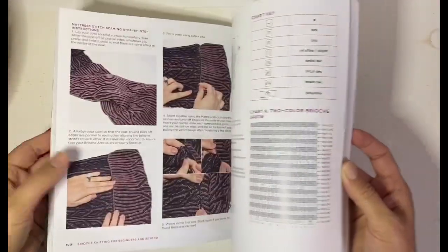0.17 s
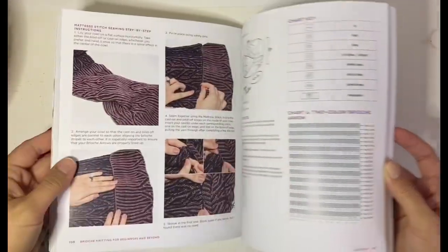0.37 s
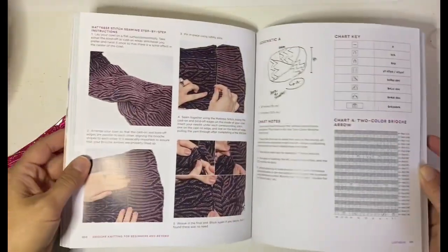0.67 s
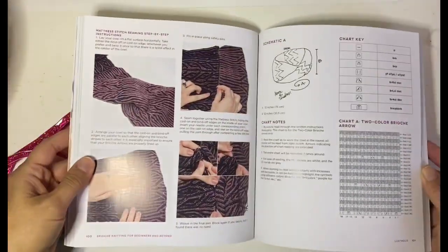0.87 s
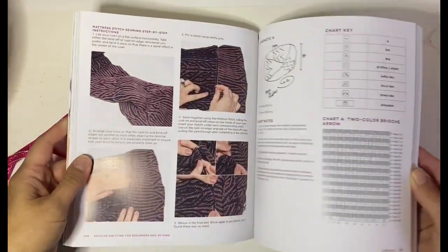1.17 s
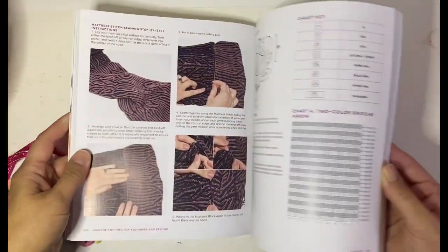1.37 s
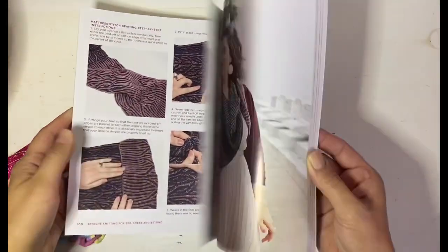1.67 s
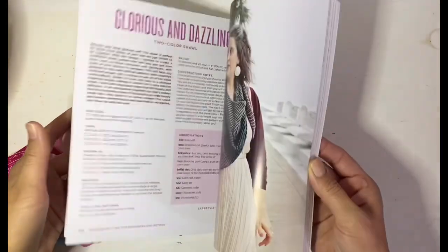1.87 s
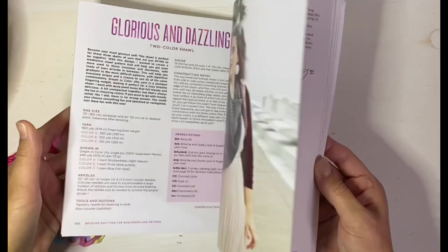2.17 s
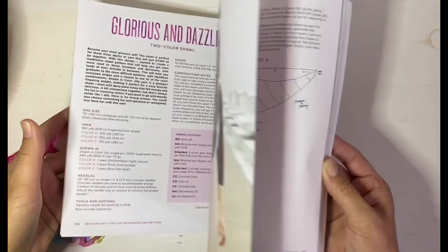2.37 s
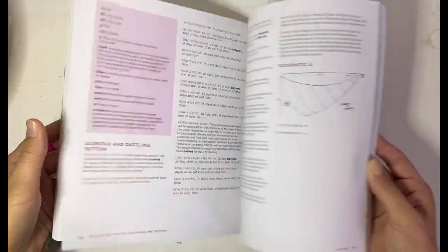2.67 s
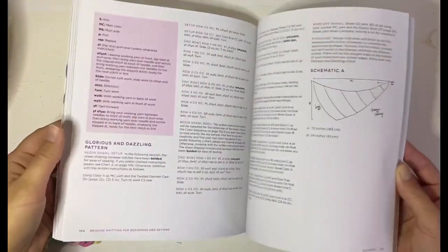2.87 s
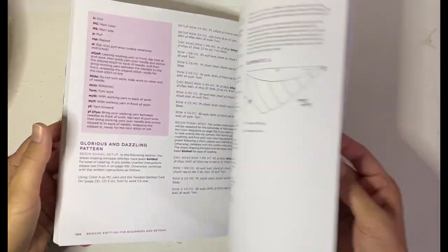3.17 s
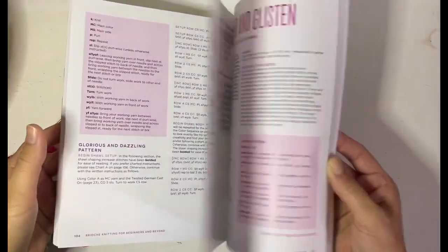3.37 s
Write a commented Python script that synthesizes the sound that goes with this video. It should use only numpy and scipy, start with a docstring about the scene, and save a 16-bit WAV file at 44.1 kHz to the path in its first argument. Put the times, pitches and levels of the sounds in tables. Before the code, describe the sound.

Glossy book pages are turned by hand close to the microphone. A soft swish leads into rustling, finger pats and several sharp paper snaps, with dull bumps from the book, over a quiet room's low rumble.

```python
"""The pages of a glossy paperback are turned by hand, close by, in a quiet room with a low rumble.
Fingers pat the paper, sheets rub and hiss as they slide over each other, the book shifts and bumps,
and a page opens under the thumb with a soft, dull swish. Page edges snap off the thumb: each snap runs
through the sheet as a bending wave, high notes first, and nudges the book into a soft thump."""
import sys
import numpy as np
from scipy import signal
from scipy.fft import rfft, irfft
from scipy.io import wavfile

SR = 44100
rng = np.random.default_rng(int(sys.argv[2]) if len(sys.argv) > 2 else 0)


def output_pcm(signal):
    """Save a mono or channel-first signal as 16-bit PCM at the path in sys.argv[1].

    Samples are clipped to [-1, 1] before scaling.
    """
    pcm = np.clip(np.atleast_2d(signal).T, -1, 1) * 32767
    wavfile.write(sys.argv[1], SR, np.round(pcm).astype(np.int16))


N = 155232
T, HZ = np.arange(N) / SR, np.fft.rfftfreq(N, 1 / SR)


def amp(db):
    """Turns decibels into a gain."""
    return 10 ** (np.asarray(db) / 20)


def unit(x):
    """Scales a signal to an average (rms) level of 1."""
    return x / np.sqrt(np.mean(abs(x) ** 2) + 1e-30)


def read(points, hz=HZ):
    """Joins a table's points into a curve along a log-frequency axis."""
    freqs, values = np.transpose(points)
    return np.interp(np.log(hz + 1), np.log(freqs), values)


def pair(a, b, likeness):
    """Mixes two noises into left and right: likeness 0 is unrelated, 1 is identical."""
    mid, side = np.sqrt((1 + likeness) / 2) * a, np.sqrt((1 - likeness) / 2) * b
    return np.array([mid + side, mid - side])


def stroke(start, end, rise, fall):
    """The speed of one movement: it eases in from start, holds, and fades after end."""
    ease_in = np.sin(np.pi / 2 * np.clip((T - start) / rise, 0, 1))
    return ease_in * np.exp(-(np.maximum(T - end, 0) / fall) ** 2)


# Room air and microphone hiss. Each row: frequency in Hz, relative level in dB.
AIR_COLOUR = [(15, -16), (30, -12), (50, -2.5), (105, 0), (250, -6.5), (310, -12), (385, -24.5),
              (620, -29.5), (1000, -28.5), (1500, -33), (2100, -36), (3000, -43), (5200, -49), (7000, -53),
              (10000, -58), (12000, -55.5), (14000, -47), (16000, -79.5)]
# The room's low resonances. Each row: frequency in Hz, width in Hz, level in dB.
ROOM_RESONANCES = [(58.9, 25, -54), (77, 13, -52.5), (124.9, 26, -56), (197.7, 22, -60), (257.5, 11, -66.5),
                   (284, 14, -66.5), (457, 55, -77), (793.6, 27, -76), (859, 290, -72)]
# The room's stereo spread. Each row: frequency in Hz, left-right likeness from 0 to 1.
AIR_LIKENESS = [(100, 1), (200, 0.99), (350, 0.88), (650, 0), (1200, 0), (1850, 0.67), (2900, .25),
                (4500, 0.13), (5500, 1), (7200, 1), (10000, 0.93), (16000, 1)]

def room_tone(air_db=-55):
    """Steady air, and a rumble that booms in the low resonances of the room."""
    power = (amp(air_db) * unit(amp(read(AIR_COLOUR)))) ** 2
    for hz, width, db in ROOM_RESONANCES:
        peak = 1 / (1 + (1.29 * (HZ - hz) / width) ** 2) ** 1.42
        power += (amp(db) * unit(peak)) ** 2
    noise = pair(*rfft(rng.standard_normal((2, N))), read(AIR_LIKENESS))
    return irfft(noise * np.sqrt(power), N)


# The paper's stereo spread. Each row: frequency in Hz, left-right likeness from 0 to 1.
PAPER_LIKENESS = [(300, 0.18), (800, 0.33), (1800, 0.79), (2900, 0.38), (5000, 0.65), (7200, 1), (10000, 1),
                  (13500, 0.96), (16000, 0.67)]

def friction(colour, slips_per_s=6500, spread_db=2):
    """Rubbing is thousands of tiny slips of uneven size; the surfaces set their tone colour."""
    sizes = amp(spread_db * np.minimum(rng.exponential(1, (2, N)), 5))
    slips = sizes * rng.choice([-1, 1], (2, N)) * (rng.random((2, N)) < slips_per_s / SR)
    spectrum = pair(*rfft(slips), read(PAPER_LIKENESS))
    return unit(irfft(spectrum * amp(read(colour)), N))


# Finger taps. Each row: start in seconds, level in dB.
FINGER_PATS = [(0.031, -59), (0.242, -64), (0.887, -55.5), (1.077, -55), (1.431, -63), (2.02, -64),
               (2.443, -63), (2.583, -63)]
# The tone of a tap. Each row: frequency in Hz, relative level in dB.
PAT_COLOUR = [(200, -34), (450, 4.5), (620, -4), (1000, -9), (2200, -23.5), (4000, -45), (16000, -68)]

def patting_fingers(decay_s=0.011):
    """Soft fingertips land on the stack of pages with a hollow pat."""
    touch = np.zeros(N)
    for start, db in FINGER_PATS:
        decay = np.exp(-np.maximum(T - start, 0) / decay_s)
        touch += amp(db) * stroke(start, start, rise=0.0051, fall=1) * decay
    return touch * friction(PAT_COLOUR)


def judder(depth_db=0.78, cutoff_hz=24.4):
    """An uneven grip makes the loudness of rubbing flutter."""
    wobble = irfft(rfft(rng.standard_normal(N)) / (1 + (HZ / cutoff_hz) ** 2), N)
    return amp(depth_db * unit(wobble))


def resonate(x, hz, width_hz):
    """A resonance that lets through a narrow band around the moving pitch hz."""
    turn = np.exp(2j * np.pi * np.cumsum(hz) / SR)
    feedback = np.exp(-np.pi * width_hz / SR)
    return 2 * (turn * signal.lfilter([1 - feedback], [1, -feedback], x / turn)).real


def ripple(x, depth_db=2.5, spacing_hz=91.8):
    """Every curved sheet has its own shallow resonances, drawn here at random."""
    freqs = np.arange(0, SR / 2, spacing_hz)
    gains_db = depth_db * rng.standard_normal(len(freqs))
    return irfft(rfft(x) * amp(np.interp(HZ, freqs, gains_db)), N)


# Sheets sliding. Each row: start, end, rise and fall in seconds, rub level in dB, hiss level in dB,
# the sheet's resonance halfway through in Hz.
PAGE_SLIDES = [(0.046, 0.476, 0.19, 0.093, -76, -99, 2450), (0.212, 0.223, .012, 0.016, -75, -82, 5270),
               (0.725, 0.85, .06, 0.044, -75, -87.5, 1310), (0.855, 0.889, 0.043, 0.029, -66.5, -74, 2200),
               (0.91, 1.005, 0.029, 0.025, -65, -68.5, 4940), (1.018, 1.137, 0.03, 0.06, -65.5, -75, 3570),
               (1.152, 1.26, 0.085, 0.074, -64.5, -77, 1380), (1.316, 1.367, 0.016, 0.09, -70.5, -79, 1760),
               (1.415, 1.621, 0.025, 0.046, -70.5, -75.5, 5500),
               (1.595, 1.613, 0.026, 0.011, -60, -73.5, 2160),
               (1.656, 1.796, 0.11, 0.038, -76, -83.5, 2380), (1.796, 1.897, 0.086, 0.057, -69, -78, 3640),
               (2.011, 2.025, 0.008, 0.028, -76, -80, 3000), (2.274, 2.56, 0.12, 0.065, -72, -84.5, 2430),
               (2.58, 2.66, 0.068, 0.082, -69.5, -82.5, 1840), (2.744, 2.934, 0.04, 0.035, -91, -94, 2600),
               (2.986, 3.18, 0.11, 0.048, -73, -76, 2120), (3.395, 3.53, 0.025, 0.027, -77, -82.5, 5450)]
# The rub and the hiss of paper on paper. Each row: frequency in Hz, relative level in dB.
RUB_COLOUR = [(150, -33), (450, 9.5), (620, 4), (1000, 3.5), (1600, -3), (2400, -2), (3400, -5),
              (5200, -6.5), (6800, -17), (9000, -35), (16000, -41)]
HISS_COLOUR = [(500, -47), (2000, 2), (3800, -13.5), (5200, 6.5), (7200, 2), (8200, 2), (11000, -0.5),
               (13000, 0), (15500, -7)]

def sliding_pages(resonance_db=-4, octaves_per_s=0.5):
    """A dull rub and a fine hiss pass through a sheet whose resonance climbs as it bends."""
    rub, hiss = friction(RUB_COLOUR), friction(HISS_COLOUR)
    out = np.zeros((2, N))
    for start, end, rise, fall, rub_db, hiss_db, sheet_hz in PAGE_SLIDES:
        paper = amp(rub_db) * rub + amp(hiss_db) * hiss
        glide = 2 ** np.clip(octaves_per_s * (T - (start + end) / 2), -1, 1)
        paper += amp(resonance_db) * resonate(paper, sheet_hz * glide, width_hz=200)
        level = np.hypot(amp(rub_db), amp(hiss_db))
        out += level * stroke(start, end, rise, fall) * unit(ripple(paper))
    return judder() * out


def thud(t, hz, decay_s):
    """The book swings at a low pitch, starting softly and dying away."""
    return np.sin(2 * np.pi * hz * t) * np.sqrt(2 * np.e * t / decay_s) * np.exp(-t / decay_s)


# Changes of grip. Each row: start, end, rise and fall in seconds, level in dB.
GRIP_SHIFTS = [(0.061, 0.264, 0.0083, 0.02, -52.5), (0.75, 0.95, 0.044, 0.048, -51.5)]
# The book's dull rumble. Each row: frequency in Hz, relative level in dB.
BOOK_COLOUR = [(30, -23), (70, 3), (135, 5.5), (165, -9.5), (210, -2.5), (300, -17.5), (420, -40),
               (900, -52), (4000, -91)]
# Bumps against the hands. Each row: start in seconds, pitch in Hz, level in dB.
BOOK_BUMPS = [(0.075, 81, -43), (0.085, 199, -49.5), (0.805, 201, -47.5), (0.82, 68.5, -41.5),
              (0.955, 220, -46), (1.037, 83, -39), (1.439, 71.7, -42.5), (2.254, 279.7, -51),
              (2.875, 76.5, -39), (3.149, 239.3, -51)]

def shifting_book():
    """The block of pages rumbles as the hands shift their grip, and bumps now and then."""
    effort = sum(amp(db) * stroke(*timing) for *timing, db in GRIP_SHIFTS)
    rumble = unit(irfft(rfft(rng.standard_normal(N)) * amp(read(BOOK_COLOUR)), N))
    bumps = sum(amp(db) * thud(np.maximum(T - start, 0), hz, decay_s=0.021)
                for start, hz, db in BOOK_BUMPS)
    return effort * rumble + bumps


# The swish of the opening page. Each row: start, end, rise and fall in seconds, level in dB.
SWISHES = [(0.49, 0.632, .135, 0.11, -59.5)]
# Skin on paper. Each row: frequency in Hz, relative level in dB.
SKIN_COLOUR = [(150, -25), (450, 2), (620, 3), (800, 5.5), (1130, -2.5), (1350, 1.5), (1750, -10),
               (2150, -3.5), (2500, -13), (2900, -6.5), (5000, -15.5), (7000, -26.5), (10000, -37.5),
               (16000, -45)]

def page_swish():
    """A soft, dull swish as the page opens under the sliding thumb."""
    speed = sum(amp(db) * stroke(*timing) for *timing, db in SWISHES)
    return judder() * speed * friction(SKIN_COLOUR)


BEND_LAG_S = 0.00258  # travel time of a 1 kHz bending wave
# The crack of a page edge. Each row: frequency in Hz, relative level in dB.
CRACK_COLOUR = [(300, -14), (1500, -31), (2300, -39), (3100, -5.5), (4200, -17.5), (5400, 2), (6600, -7),
                (8900, 5), (10500, -0.5), (13000, 3), (16000, 1)]

def snap(flex_db, crack_db, decay_s, flex_hz, thump_db, tilt_db, samples=4096):
    """A burst of slips makes the sheet flex and crack, low notes last; the book thumps softly."""
    t, hz = np.arange(samples) / SR, np.fft.rfftfreq(samples, 1 / SR)
    burst = unit(rng.standard_normal(samples) * np.exp(-t / decay_s))
    # Waves bounce back from the sheet's edges, strongly in the flex and weakly in the crack.
    echoes = pair(*rng.standard_normal((2, samples)), likeness=0.32)
    flex_ring = amp(-0.5) * unit(echoes * np.exp(-t / 0.007))
    crack_ring = amp(-11.5) * unit(echoes * np.exp(-t / 0.0065))
    flex_band = np.exp(-0.5 * (np.log2((hz + 1) / flex_hz) / 0.75) ** 2)  # spread of 0.75 octave
    crack_band = amp(read(CRACK_COLOUR, hz) + tilt_db * np.log2(1 + hz / 1100))  # tilts above 1100 Hz
    flex = amp(flex_db) * unit(flex_band * rfft(burst + flex_ring))
    crack = amp(crack_db) * unit(crack_band * rfft(burst + crack_ring))
    bend_delay = np.exp(-4j * np.pi * BEND_LAG_S * np.sqrt(hz * 1000))
    paper = irfft((flex + crack) * bend_delay)
    return paper - amp(thump_db) * thud(t, hz=86, decay_s=0.0047)


# Page snaps. Each row: time in seconds, flex and crack strength in dB, burst decay in seconds,
# flex pitch in Hz, thump level in dB, crack tilt in dB per octave (higher is brighter).
PAGE_SNAPS = [(0.775, -43.5, -53, 0.0021, 2750, -40, -24), (0.988, -41, -45, 0.014, 3500, -54, -3),
              (1.0772, -35, -34.5, 0.0025, 1000, -56, -12), (1.325, -37, -32, 0.0018, 900, -72, 12),
              (1.4376, -32.5, -25.5, 0.00083, 1760, -45, -1), (1.9986, -52, -49, 0.0017, 2590, -53, -4),
              (2.0183, -35, -37.5, 0.00066, 1130, -60, -8), (2.918, -55, -52, 0.005, 3500, -41, -18),
              (3.131, -40.5, -44.5, 0.007, 1710, -51, -4), (3.145, -31, -31.5, 0.0012, 1540, -39, -4)]

def snapping_pages():
    """Page edges snap off the thumb, each timed by the arrival of its high notes."""
    out = np.zeros((2, N))
    treble_lag_s = BEND_LAG_S / np.sqrt(10)  # travel time at 10 kHz
    for time, *settings in PAGE_SNAPS:
        sound = snap(*settings)
        first = round((time - treble_lag_s) * SR)
        out[:, first:first + sound.shape[1]] += sound[:, :N - first]
    return out


def reflections(x, level_db=-21, fade_s=0.081):
    """A small furnished room adds a short echo that drops 60 dB in fade_s."""
    t = T[:SR // 3]
    tail = rng.standard_normal((2, len(t))) * amp(-60 * t / fade_s) * (t > 0.003)
    tail = unit(tail) / np.sqrt(len(t))
    return amp(level_db) * signal.fftconvolve(x, tail, axes=1)[:, :N]


def scene():
    """The book close by, in its quiet room."""
    paper = patting_fingers() + sliding_pages() + page_swish() + snapping_pages()
    return room_tone() + paper + reflections(paper) + shifting_book()


# The two microphone openings. Each row: frequency in Hz, how far left leads right in radians.
MIC_PHASE = [(20, 0), (1700, 0), (3000, .9), (4400, .75), (5300, .4), (6000, 1.55), (7100, 2.9),
             (7900, 3.35), (9000, 4.9), (10000, 6.2), (11100, 6.5), (12000, 7.8), (13100, 9.25),
             (14100, 9.65), (15000, 11), (16300, 12.5)]

def record(dry, top_hz=16050):
    """The two microphone openings hear high notes out of step; the very highest are cut off."""
    phase = np.interp(HZ, *np.transpose(MIC_PHASE))
    shifted = irfft(rfft(dry) * np.exp(0.5j * np.array([phase, -phase])), N)
    lowpass = signal.firwin(255, top_hz, window=("kaiser", 9), fs=SR)
    return signal.oaconvolve(shifted, lowpass[None], "same")


dry = scene()
out = record(dry)
output_pcm(out)
```